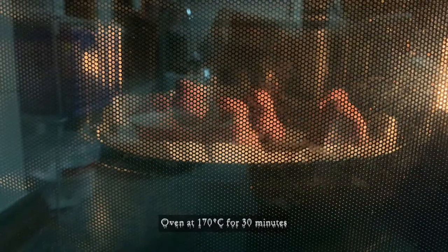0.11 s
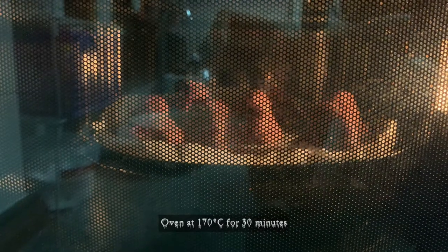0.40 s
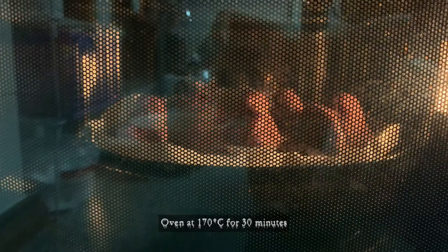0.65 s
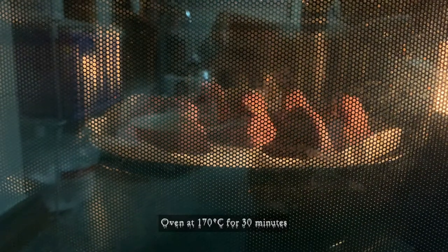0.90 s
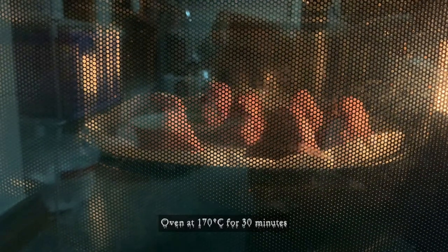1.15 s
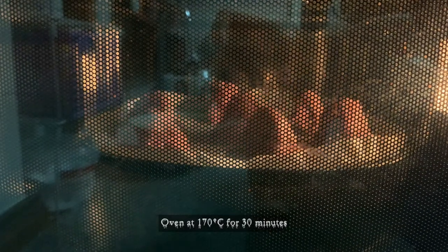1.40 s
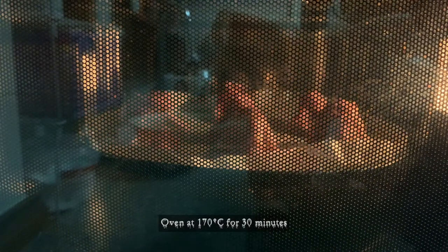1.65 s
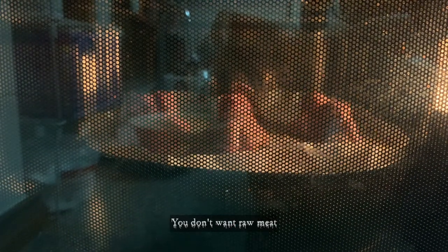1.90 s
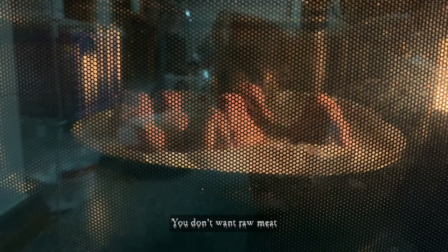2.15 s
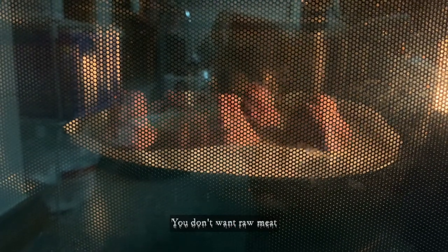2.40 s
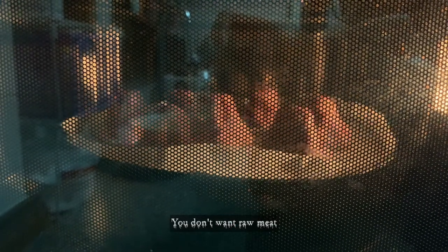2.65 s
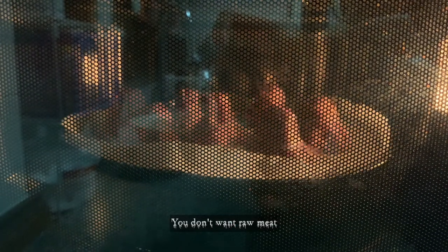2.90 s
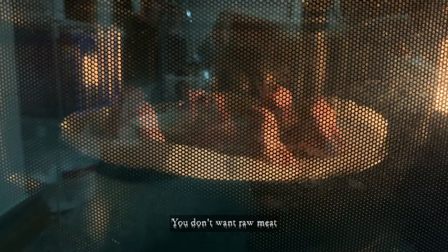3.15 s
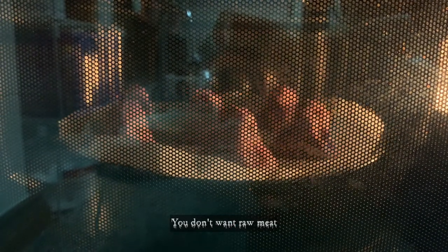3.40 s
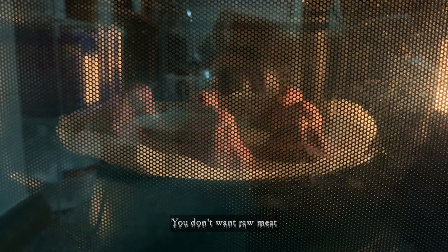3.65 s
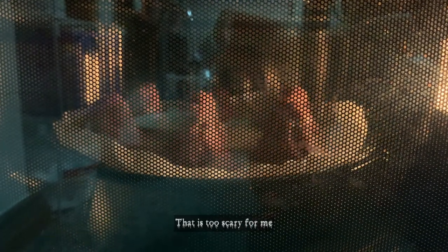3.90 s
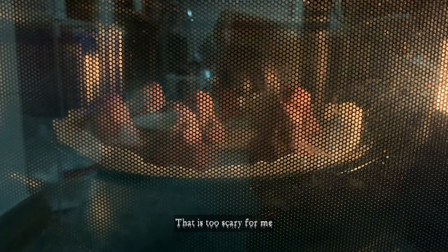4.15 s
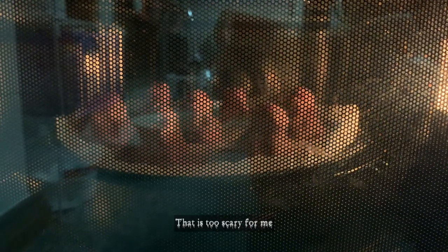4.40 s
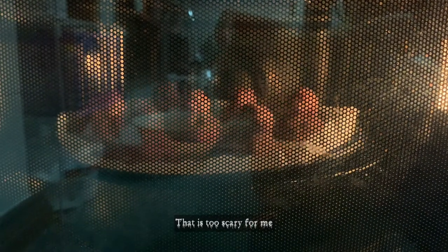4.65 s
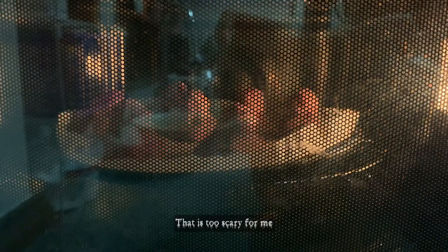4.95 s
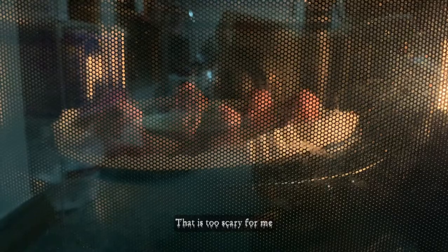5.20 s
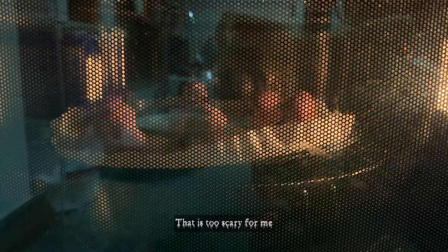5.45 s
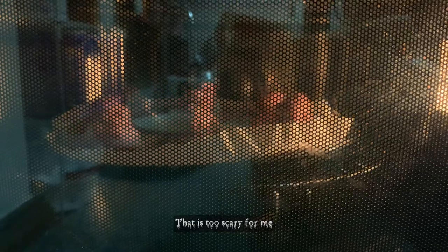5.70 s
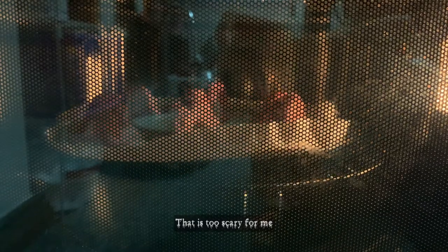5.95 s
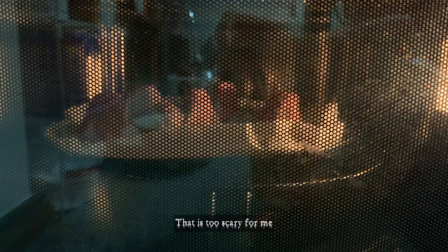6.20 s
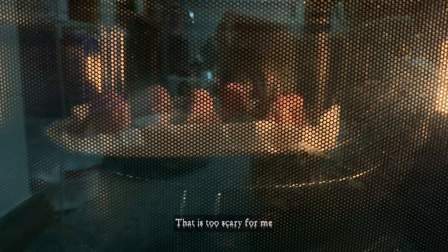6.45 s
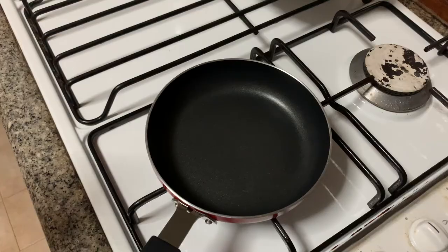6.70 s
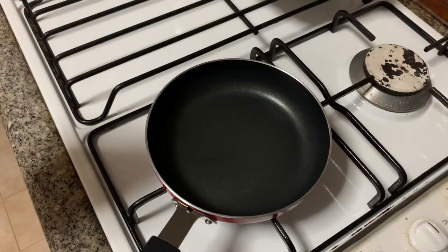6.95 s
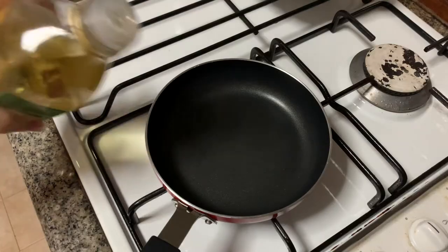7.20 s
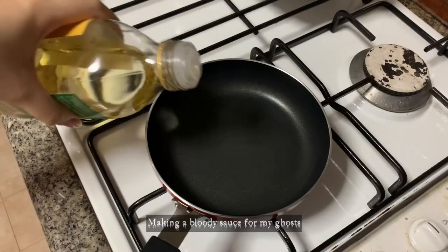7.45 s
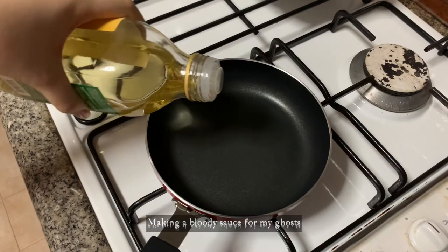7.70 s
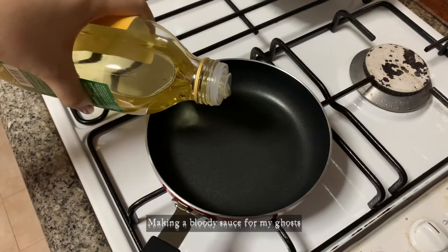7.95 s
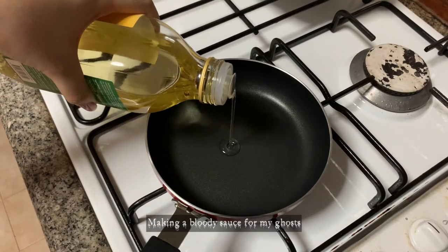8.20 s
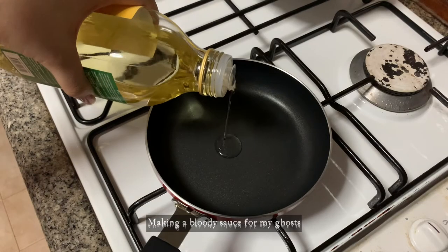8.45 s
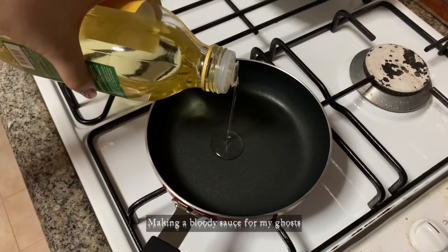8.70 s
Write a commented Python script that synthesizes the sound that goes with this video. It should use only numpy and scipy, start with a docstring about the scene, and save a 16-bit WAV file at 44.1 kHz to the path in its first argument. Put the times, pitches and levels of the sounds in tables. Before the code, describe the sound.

A microwave oven hums and blows air up close while its turntable ticks rapidly, then an abrupt cut leaves it fainter and duller across the kitchen.

```python
"""A combination oven runs in a kitchen, heard at its door, then after a hard cut from the stove nearby.
From the start the transformer hums in sines, the fan blows coloured noise through the casing and adds a
blade tone, fat pops in filtered clicks, and the turntable gear ticks evenly in short decaying modes.
Soon a loose part pings in single sines; later the tray rattles in bursts of resonant noise, and something
thuds softly in low ringing modes. After the cut the ticks are duller and the hum is weaker."""
import sys
import numpy as np
from scipy import signal
from scipy.fft import rfft, irfft
from scipy.io import wavfile
from scipy.ndimage import uniform_filter1d

SR = 44100
rng = np.random.default_rng(int(sys.argv[2]) if len(sys.argv) > 2 else 0)


def store_pcm(level_fs):
    """Save levels as 16-bit WAV."""
    pcm = np.round(np.clip(level_fs, -1, 1) * 32767).astype(np.int16)
    wavfile.write(sys.argv[1], SR, np.atleast_2d(pcm).T)


def volts_from_decibels(level):
    """Turn decibel levels (scalar or array-like) into linear amplitude factors."""
    exponent = np.asarray(level, float) / 20
    return 10 ** exponent


N = 389844  # length in samples
T = np.arange(N) / SR  # time, s
HZ = np.maximum(np.arange(N // 2 + 1) * SR / N, 1)  # frequencies of the spectrum
SIDES = np.array([[1], [-1]])  # left, right
CUT_S = 6.57906  # from the door to the stove
HUM_HZ = 100.08  # twice the mains frequency


def curve(rows, order=1):
    """One column of a table, joined over time."""
    return np.interp(T, np.array(rows)[:, 0], np.array(rows)[:, order])


def colour(rows, order=1):
    """One column of a table, joined over log frequency."""
    return np.interp(np.log(HZ), np.log(np.array(rows)[:, 0]), np.array(rows)[:, order])


def bumps(peaks):
    """Resonance peaks in dB over frequency."""
    return sum(db / (1 + (2 * (HZ - hz) / width) ** 2) for hz, width, db in peaks)


def level(x, db):
    """Scale to an rms level."""
    return x * volts_from_decibels(db) / np.sqrt(np.mean(x ** 2))


def walk(rate):
    """Slow random drift with a spread near 1; rate is in new values per second."""
    k = int(SR / rate)
    steps = np.repeat(rng.standard_normal(N // k + 1), k)
    return 1.3 * uniform_filter1d(uniform_filter1d(steps, k), k)[:N]


def swells(rows):
    """Smooth humps in time, one a row, height 1."""
    return [np.exp(-((T - s) / half) ** 4) for s, half, _ in rows]


def ring(x, hz, t60):
    """A decaying mode, peak 1 for a unit push."""
    pole = np.exp(2j * np.pi * hz / SR - np.log(1000) / (t60 * SR))
    return signal.lfilter([1], [1, -pole], x).imag


def tone(phase, lag):
    """A unit-rms sine that reaches the right microphone a little later; lag is in radians."""
    return np.sqrt(2) * np.cos(phase + SIDES * lag / 2)


def reverb(x, t60, wet_db):
    """Dense reflections, unrelated at the two microphones, added to the direct sound."""
    t = T[:SR // 4]
    tail = rng.standard_normal((2, len(t))) * volts_from_decibels(-60 * t / t60) * np.minimum(t / 0.0031, 1)
    tail = tail / np.sqrt(np.sum(tail ** 2) / 2)
    return x + volts_from_decibels(wet_db) * signal.fftconvolve(x, tail, axes=1)[:, :N]


# patches in the treble, now centred, now wide: f/Hz, change of the sum/dB, change of the difference/dB
PATCHES = [(6900, 1.5, 2.5), (7600, -5, 8), (8160, 0, -5.5), (9000, 0.5, -25.5), (9700, 2, -25.5),
           (10100, -1.5, -5), (11200, -3, -3.5), (11700, -27.5, -4), (12300, -31.5, 0.5),
           (12700, -4.5, -25), (14700, -1, -25.5), (14600, -6, -5), (15600, -30.5, -22)]


def wide_noise(mid_db, side_db, lean, level_db, side_gain_db, echo_s):
    """Two microphones in a noise field: a sum and a partly related difference, each with its colour."""
    a, b = rfft(rng.standard_normal((2, N)))
    # one strong reflection swings the image left and right along the spectrum
    echo = 0.32 * np.exp(-2j * np.pi * HZ * echo_s) * HZ ** 2 / (HZ ** 2 + 700 ** 2)
    tie = colour(lean) + 1j * colour(lean, order=2) + echo
    tie = tie / np.maximum(abs(tie) / .95, 1)
    # many standing waves roughen the spectrum finely: here the walk runs along frequency
    ripple_db, ripple_width_hz = 1.43, 30
    ripple = walk(SR * HZ[-1] / len(HZ) / ripple_width_hz)[:len(HZ)]
    ripple = ripple_db * ripple * HZ / (HZ + 800)
    mid = irfft(a * volts_from_decibels(mid_db + ripple + colour(PATCHES)), N)
    related = tie * a + np.sqrt(1 - abs(tie) ** 2) * b
    side = irfft(related * volts_from_decibels(side_db + colour(PATCHES, order=2)), N)
    return level(mid, level_db) + SIDES * level(side, level_db + side_gain_db)


def turbulent(x, peaks):
    """Turbulence: resonances swell and sink one by one, and patches of the noise flicker."""
    waver_share, waver_per_s = 0.24, 5.6
    flicker_db, flicker_width_hz, flicker_s = 1.0, 900, .04
    hz, t, z = signal.stft(x, SR, nperseg=2048, noverlap=1536)
    at = np.minimum((t * SR).astype(int), N - 1)
    db = 0
    for f, width, d in peaks:
        if d > 0:
            shape = d / (1 + (2 * (hz - f) / width) ** 2)
            db = db + np.outer(shape, waver_share * walk(waver_per_s)[at])
    patch = rng.standard_normal(z.shape[1:])
    for _ in range(2):
        patch = uniform_filter1d(patch, max(int(flicker_width_hz / hz[1]), 1), axis=0)
        patch = uniform_filter1d(patch, max(int(flicker_s / t[1]), 1), axis=1)
    z = z * volts_from_decibels(db + flicker_db * patch / patch.std())
    return signal.istft(z, SR, nperseg=2048, noverlap=1536)[1][:, :N]


# hum overtones: multiple of the hum, level/dB at the door, level/dB at the stove
OVERTONES = [(3, -67.5, -67.5), (4, -62.5, -57.5)]


def transformer(spot, hum, pan_db):
    """The core flexes twice a mains cycle: a clean tone with faint overtones."""
    phase = 2 * np.pi * HUM_HZ * T
    out = volts_from_decibels(curve(hum) + SIDES * pan_db / 2) * tone(phase, .23)
    for row in OVERTONES:
        out = out + volts_from_decibels(row[spot] + 0.55 * walk(3.5)) * tone(row[0] * phase, 0.36)
    return out


# wavering hum at the door: t/s, level/dB
HUM_DOOR = [(0.0, -28.5), (0.03, -27.5), (0.14, -26.5), (2.32, -27), (2.38, -29.5), (3.07, -26),
            (3.64, -27), (3.97, -32), (4.15, -24), (4.48, -28.5), (4.63, -25), (5.27, -28.5), (5.36, -24.5),
            (5.71, -28.5), (5.76, -25), (6.04, -28), (6.24, -25.5), (6.57, -26.5)]


def door_hum():
    """The transformer's steady pitch at the door, with a wavering level."""
    return transformer(1, HUM_DOOR, 0)


# airflow at the door, sum and difference of the two microphones: f/Hz, relative level/dB per Hz
DOOR_MID = [(100, -23.5), (135, -2.5), (165, -2), (210, -7), (300, -10.5), (420, -16), (800, -21.5),
            (1150, -22), (1450, -26.5), (2050, -30.5), (2500, -32), (2800, -39), (3800, -40), (4850, -44.5),
            (5300, -51.5), (7300, -61.5), (8300, -59.5), (16000, -60.5)]
DOOR_SIDE = [(100, -25.5), (135, -3), (250, -2.5), (320, -10.5), (420, -12), (560, -5), (720, -13),
             (940, -6), (1400, -14), (1780, -11), (2050, -20), (2500, -18), (2800, -25.5), (3800, -24.5),
             (4850, -34.5), (5300, -35.5), (7300, -42), (16000, -48.5)]
# low rumble of the casing at the door: f/Hz, relative level/dB per Hz
RUMBLE_DOOR = [(20, -50.5), (32, -32.5), (44, -12.5), (58, -3.5), (72, -2), (95, 6.5), (115, 6.5),
               (132, -9), (150, -37), (400, -90)]
# casing resonances in the airflow: f/Hz, width/Hz, change/dB
CASING = [(173, 25, 5), (252, 65, 3), (321, 3.1, 2), (434, 10, 3.5), (553, 120, 2.5), (667, 74, 4.5),
          (710, 36, -9), (755, 37, 6), (833, 16, 5), (1018, 37, -4.5), (1047, 25, 10), (1135, 24, 6.5),
          (1257, 60, 3.5), (1553, 34, 6), (1658, 28, 5), (1682, 39, 8.5), (1880, 37, 6.5), (2540, 40, 2.5),
          (3900, 90, 4.5), (4400, 50, 5.5), (4530, 35, 7), (1704, 36, -7), (2000, 29, 0), (2600, 41, -1),
          (2680, 100, -8), (2800, 58, 5.5), (3620, 60, 4.5), (3660, 30, -0.5), (3850, 40, 4), (4950, 43, 6),
          (5430, 44, 1.5), (5740, 50, 6.5), (6600, 60, 1.5)]
# share of the difference tied to the sum: f/Hz, leaning left/share, leading left/share
LEAN_DOOR = [(30, 0, .3), (65, 0, 0.28), (100, -0.16, 0.68), (200, 0.058, .75), (500, 0.26, 0.64),
             (810, 0.53, 0.36), (1130, 0.49, 0), (1450, 0.14, -0.18), (2500, 0.049, -.1), (5000, 0, 0)]


def door_airflow():
    """The fan's air rushes through the resonant casing, with a low rumble under it, in gusts."""
    air = wide_noise(colour(DOOR_MID) + bumps(CASING), colour(DOOR_SIDE), LEAN_DOOR, -39.0, -8.5, .0035)
    rumble_db = colour(RUMBLE_DOOR)
    rumble = wide_noise(rumble_db, rumble_db, LEAN_DOOR, -39.5, -11, .0035)
    gusts = volts_from_decibels(.6 * walk(5))
    return gusts * (turbulent(air, CASING) + rumble)


# multiples of the blade tone: multiple, relative level/dB, drift at the door/dB per s
BLADE_ORDERS = [(1, -4, 0), (2, 0.5, -0.8), (3, -16.5, 1.06)]
# moments where the blade tone stands out or drops: middle t/s, half length/s, change/dB
BLADE_SWELLS = [(1.9, 0.079, 3.5), (2.478, 0.09, 4.5), (2.902, .15, -5), (3.182, 0.15, 4.5),
                (3.5, 0.13, -5.5), (4.602, 0.072, 3.5), (6.717, 0.049, -6), (6.914, 0.14, 6),
                (7.404, 0.06, 5), (8.62, 0.084, 6)]


def blades():
    """Blade-passing tone that wavers with the turbulent inflow."""
    blade_hz, door_db, stove_db, waver_db = 114.3, -42.5, -55.5, 0.35
    phase = np.cumsum(2 * np.pi * blade_hz * (1 + .005 * walk(6)) / SR)
    at_door = T < CUT_S
    level_db = np.where(at_door, door_db, stove_db) + waver_db * walk(5)
    level_db = level_db + np.array(BLADE_SWELLS)[:, 2] @ swells(BLADE_SWELLS)
    out = 0
    for k, db, drift in BLADE_ORDERS:
        order_db = level_db + db + drift * T * at_door + 1.5 * walk(7)
        out = out + volts_from_decibels(order_db) * tone(k * phase, 0.23 * k)
    return out


# fat pops: t/s, relative level/dB, left minus right/dB
POPS = [(0.0504, -45.5, -3), (2.1885, -40.5, -4), (2.394, -42.5, -6), (2.811, -44.5, 0), (3.9902, -50, -5),
        (4.4272, -49, 6), (5.0645, -42.5, 4), (5.9677, -47, -4.5), (8.2296, -56, -4)]


def pops():
    """Bursting fat: clicks of about one cycle, from single impulses through a band filter."""
    out = np.zeros((2, N))
    for s, db, pan_db in POPS:
        out[:, int(s * SR)] = volts_from_decibels(db + np.array([pan_db, -pan_db]) / 2)
    band = signal.butter(3, [1500, 6600], "band", fs=SR, output="sos")
    return volts_from_decibels(11.0) * signal.sosfilt(band, out)


# load on the gear as the dish turns: t/s, change/dB
GRIP = [(0, -2), (1.5, 0.5), (2.6, -0.5), (3.1, 0.5), (4.5, -2), (5.4, 1), (6.1, 2), (6.5, 0), (6.6, 1),
        (8.84, 2.5)]
# teeth that strike hard, late or hardly at all; each stands in for the regular tooth:
# t/s, strength/dB, brightness/dB
ODD_TEETH = [(0.0645, 2, -4), (.1436, -6, 1), (0.224, -5.5, 2.5), (0.3028, 6, 15), (.896, -3, 21),
             (.969, 0.5, -2), (1.0223, 2.5, 17.5), (1.103, -2, -1.5), (1.263, -4, 2), (1.3407, 3.5, 15.5),
             (1.4223, 1.5, 9), (1.502, 0, 1), (1.6597, 3, 15), (1.8212, 3, 7), (1.981, 1, 0),
             (2.461, -6, 2), (2.541, -3, 3), (2.621, -2.5, -2), (2.781, -2.5, -2), (2.8602, 2, 11.5),
             (2.94, 3.5, 9.5), (3.023, 2, -4), (3.1, 4.5, -5), (3.3399, 3, 10.5), (3.421, 0, -1),
             (3.5005, -3.5, 3), (3.661, 3, 7), (3.762, -1.5, 13), (3.845, -1, 14), (3.8999, -7, 2),
             (3.98, 3, 7), (4.0605, 2, 3), (4.1405, 0.5, 1), (4.22, -7, -0.5), (4.379, 2, 1),
             (4.458, -3, -1), (4.569, -1, 2), (4.6202, -5.5, 2), (4.699, 3, 5), (4.779, 2, 1.5),
             (4.939, -4, 6), (5.098, 1.5, 11), (5.1779, 3, 7), (5.259, -11, 1), (5.338, -0.5, -1),
             (5.418, 1, 12), (5.578, -2.5, 21), (5.8175, 1.5, -4), (6.0575, 2, 6), (6.218, 2.5, 16),
             (6.297, -1.5, 0), (6.3766, -5, -3), (6.459, -1, 3), (6.797, 6, 7), (6.877, -2, 0),
             (7.197, -1, 0), (7.277, 0, 6), (7.3565, 1.5, 10), (7.437, 2.5, 0), (7.676, 4.5, -2),
             (7.755, 0, 0), (7.915, 0, 0), (7.995, 1.5, 0), (8.155, 3, 0), (8.2345, 2.5, 2), (8.314, 4, 0),
             (8.394, 4.5, -2), (8.474, -4, 0), (8.553, 1, 0), (8.634, -1, 0), (8.793, 3.5, 0)]


def teeth(first_s, period_s, end_s):
    """Rows (t/s, strength/dB, brightness/dB): an even train of chance strength, odd teeth put in."""
    scatter_db, bright_scatter_db = 0.6, 3
    s = np.arange(first_s, end_s, period_s)
    rows = np.column_stack([s, rng.standard_normal((len(s), 2)) * [scatter_db, bright_scatter_db]])
    rows[:, 1] += curve(GRIP)[(s * SR).astype(int)]
    for row in ODD_TEETH:
        if first_s <= row[0] < end_s:
            rows[int((row[0] - first_s) / period_s + .1)] = row
    return rows


# what a tick rings with: f/Hz, t60/s, relative level/dB at the door, the same at the stove, build-up/s
TICK_MODES = [(2348, 0.03, 16, 8, 0.0064), (2236, 0.031, -7.5, 0, 0.00092),
              (2164, 0.16, -12.5, -14, 0.0068), (1800, 0.089, -12.5, -11, 0.0013),
              (2436, 0.16, -8.5, -4.5, 0.005), (2520, 0.08, -10.5, -3, 0.0054),
              (2610, 0.16, -11, -13.5, 0.0059), (3430, 0.038, -12, -21, 0.0015),
              (3770, 0.091, -13, -22, 0.0066), (3160, 0.073, -20.5, -15, .002),
              (1267, 0.081, -11, -11, 0.0016), (5300, 0.022, -32, -26, 0.0029),
              (6200, 0.028, -43, -34, .001), (8400, 0.089, -41.5, -34, .001)]


def gear(rows, level_db, spot):
    """Each tooth slips over a few ms and rings the tray, never quite the same modes twice."""
    bright_from_hz, bright_full_hz = 2900, 7050  # brightness lifts the modes more and more between these
    glide, glide_s = .035, .006  # a tick starts this share flat and rises as the contact lets go
    detune, lag_rad = 0.0047, 0.53  # pitch scatter as a share; usual phase lead at one microphone
    fall_bend = 1.08  # over 1: a tick holds, then drops
    out = np.zeros((2, N + SR))
    t = T[:SR // 8]
    modes = np.array(TICK_MODES)
    hz, t60, rise = (modes[:, [column]] for column in (0, 1, 4))
    mode_db = level_db + modes[:, spot]
    lift = np.log(hz / bright_from_hz) / np.log(bright_full_hz / bright_from_hz)
    lift = np.clip(lift, 0, 1)[:, 0]
    bent = t - glide * glide_s * (1 - np.exp(-t / glide_s))  # time bent for the glide
    shape = (1 - np.exp(-t / rise)) ** 1.29 * volts_from_decibels(-60 * (t / t60) ** fall_bend)
    for s, db, bright_db in rows:
        uneven, start, lag, off = rng.standard_normal((4, len(hz), 1))
        # each mode reaches one microphone a little before the other
        lead = SIDES[:, :, None] * (lag_rad * np.sign(lag) + 0.42 * lag)
        phase = 2 * np.pi * hz * (1 + detune * off) * bent + 0.69 * start + lead
        gain = volts_from_decibels(mode_db + db + lift * bright_db + 1.2 * uneven[:, 0])
        i = int(s * SR)
        out[:, i:i + len(t)] += gain @ (shape * np.sin(phase))
    return out[:, :N]


def cracks(rows):
    """A short crack of fading noise opens each tick, louder for strong and bright ones."""
    blows = np.zeros(N)
    for s, db, bright_db in rows:
        blows[int(s * SR)] = volts_from_decibels(-78 + db + bright_db)
    fall = signal.lfilter([1], [1, -np.exp(-1 / (0.012 * SR))], blows)
    band = signal.butter(4, [3000, 8600], "band", fs=SR, output="sos")
    return signal.sosfilt(band, fall * rng.standard_normal((2, N)))


def scrapes(rows, level_db):
    """Each tooth drags over its neighbour: a short rough puff of noise with the tick."""
    blows = np.zeros(N)
    for s, db, _ in rows:
        blows[int(s * SR)] = volts_from_decibels(level_db + db)
    t = T[:SR // 10] / 0.015  # time in units of 15 ms
    drag = np.convolve(blows, t * np.exp(1 - t) ** 2)[:N]
    wide = signal.butter(4, [1000, 2750], "band", fs=SR, output="sos")
    close = signal.butter(4, [2150, 2700], "band", fs=SR, output="sos")
    rough = drag * rng.standard_normal(N)
    return signal.sosfilt(wide, rough) + volts_from_decibels(6) * signal.sosfilt(close, rough)


def door_ticks():
    """The turntable gear from close by: ringing, cracks and scrapes of the same teeth."""
    rows = teeth(first_s=.0637, period_s=.07992, end_s=CUT_S)
    return gear(rows, -45.5, spot=2) + cracks(rows) + scrapes(rows, -58.5)


# faint pings between the teeth: t/s, level/dB, f/Hz
PINGS = [(.518, -65, 3880), (.712, -56, 3790), (.836, -62, 3780), (.903, -62, 3840), (2.949, -61, 3800),
         (4.495, -61, 3660)]


def pings():
    """Short single rings of a loose part."""
    t60_s, rise_s = 0.055, .003
    out = np.zeros((2, N))
    t = T[:SR // 8]
    for s, db, hz in PINGS:
        i = int(s * SR)
        shape = volts_from_decibels(db - 60 * t / t60_s) * np.minimum(t / rise_s, 1)
        out[:, i:i + len(t)] += shape * tone(2 * np.pi * hz * t, .6)
    return out


# tray rattles: t/s, relative level/dB, lowest resonance/dB, length/s
RATTLES = [(3.846, -55, -8, 0.033), (5.065, -55, -0.5, 0.036), (5.137, -52.5, -4, 0.024),
           (5.276, -61.5, -1, 0.035), (5.42, -64.5, -2, 0.033), (5.562, -65.5, 3, 0.027)]
# resonances of the tray: f/Hz, width/Hz, relative level/dB
TRAY = [(3930, 390, 2), (4800, 650, -11.5), (5850, 310, -7.5), (6080, 300, -8), (6460, 330, -14.5),
        (7980, 950, -14.5), (9600, 400, -23)]


def tray():
    """The glass tray chatters on its rollers: a burst of tiny knocks in its resonances."""
    rise_s, tail_s, tail_db = 0.0025, .12, -17.5
    low, *upper = (volts_from_decibels(db) / (1 + 2j * (HZ - hz) / width) ** 2 for hz, width, db in TRAY)
    knocks = rng.standard_normal((2, N)) * volts_from_decibels(3.7 * walk(300))
    out = 0
    for s, db, low_db, length in RATTLES:
        since = np.maximum(T - s, 0)
        fall = np.exp(-since / length) + volts_from_decibels(tail_db) * np.exp(-since / tail_s)
        shake = volts_from_decibels(db + 17) * (1 - np.exp(-since / rise_s)) * fall
        out = out + rfft(shake * knocks) * (volts_from_decibels(low_db) * low + sum(upper))
    return irfft(out, N)


# soft thuds: t/s, relative level/dB, lowest ring f/Hz, push/s
THUDS = [(5.571, -27, 165, 0.00088), (7.368, -32, 205.6, 0.00063)]
# what a thud rings with: multiple of the lowest ring, t60/s, relative level/dB
THUD_MODES = [(1, 0.2, 0), (1.6, .2, -0.5), (2, 0.34, -3), (2.3, 0.12, -3), (2.8, .2, 0), (3.3, .12, -13)]


def thuds():
    """A soft blow on a hollow body."""
    out = 0
    for s, db, hz, push_s in THUDS:
        blow = np.exp(-((T - s) / push_s) ** 2)
        # press and release: no lasting force
        push = np.gradient(blow) / (2 * np.pi * hz / SR * blow.sum())
        out = out + sum(volts_from_decibels(db + d) / k * ring(push, k * hz, t60) for k, t60, d in THUD_MODES)
    return out * np.ones((2, 1))


def door():
    """The oven from close by: hum and air direct, ticks and rattles with some room."""
    return door_hum() + door_airflow() + reverb(door_ticks() + tray() + pings(), 0.15, -8.0)


# wavering hum at the stove: t/s, level/dB
HUM_STOVE = [(6.6, -44), (6.66, -37), (7.02, -42.5), (7.15, -38), (7.5, -42), (7.69, -38.5), (8.31, -38),
             (8.43, -35.5), (8.84, -38.5)]
# the hum's second multiple swells and dies away across the room: middle t/s, half length/s, level/dB
OCTAVE_SWELLS = [(6.58, 0.059, -54), (7.055, 0.21, -42.5), (8.053, 0.456, -42.5), (8.86, 0.1, -45)]


def stove_hum():
    """The transformer across the room, with its octave swelling and dying away."""
    swell = volts_from_decibels(np.array(OCTAVE_SWELLS)[:, 2]) @ swells(OCTAVE_SWELLS)
    octave = swell * volts_from_decibels(-1.5 * SIDES) * tone(4 * np.pi * HUM_HZ * T, .9)
    return transformer(2, HUM_STOVE, -4) + octave


# airflow at the stove, sum and difference of the two microphones: f/Hz, relative level/dB per Hz
STOVE_MID = [(100, -42), (135, -11), (165, 1.5), (200, -2), (260, -9.5), (320, -9.5), (370, -12),
             (420, -11.5), (700, -19.5), (880, -29), (960, -19), (1400, -25), (1520, -27.5), (2500, -35),
             (3800, -37), (5300, -43), (7300, -46), (11000, -53), (16000, -49)]
STOVE_SIDE = [(100, -30), (135, -8.5), (200, 0.5), (260, -3), (370, -13.5), (560, -12.5), (800, -17),
              (1250, -15.5), (1450, -20), (2500, -26), (3800, -30.5), (5300, -38), (16000, -43)]
# low rumble of the casing at the stove: f/Hz, relative level/dB per Hz
RUMBLE_STOVE = [(20, -38.5), (40, -16), (64, -13), (74, -8), (95, -0.5), (115, -7), (132, -1), (150, -28),
                (400, -89)]
# casing and room resonances in the airflow: f/Hz, width/Hz, change/dB
KITCHEN = [(159, 13, 3), (287, 10, 1.5), (281, 10, 1.5), (378, 11, -11.5), (470, 7.9, 3.5),
           (483, 17, -18.5), (518, 16, -4.5), (650, 16, -5), (890, 28, 4.5), (310, 5, 2), (341.3, 6.4, 7.5),
           (448, 12, -2), (600, 12, -1.5), (824, 20, 11.5), (949, 19, 5), (1130, 38, 2), (1348, 30, 6.5),
           (1620, 24, 6), (2400, 120, 3.5), (3350, 80, 2)]
# share of the difference tied to the sum: f/Hz, leaning left/share, leading left/share
LEAN_STOVE = [(30, -.4, -.1), (100, -0.77, 0.07), (165, -0.99, 0), (230, -0.8, 0.77), (300, 0.18, .85),
              (420, 0.15, .65), (700, -0.1, .4), (1140, 0.13, 0.12), (2000, 0.069, 0), (5000, -0.13, 0)]
# the airflow's treble swells a little, then dulls: t/s, change/dB
TREBLE_STOVE = [(6.6, 2.5), (7.0, 1), (7.35, 3), (7.9, -0.5), (8.84, -3)]


def stove_airflow():
    """The fan's air and the casing's rumble, coloured by the room, with a changing treble."""
    air = wide_noise(colour(STOVE_MID) + bumps(KITCHEN), colour(STOVE_SIDE), LEAN_STOVE, -44.5, -5.0, .006)
    treble = irfft(rfft(air) / (1 + (5600 / HZ) ** 2), N)  # mostly above 5600 Hz
    air = air + (volts_from_decibels(curve(TREBLE_STOVE)) - 1) * treble
    rumble_db = colour(RUMBLE_STOVE)
    rumble = wide_noise(rumble_db, rumble_db, LEAN_STOVE, -48.5, -6.0, .006)
    gusts = volts_from_decibels(0.56 * walk(4.6))
    return gusts * (turbulent(air, KITCHEN) + rumble)


def stove_ticks():
    """The turntable gear across the room: ringing and scrapes, without cracks."""
    rows = teeth(first_s=6.6382, period_s=.07981, end_s=N / SR)
    return gear(rows, -57, spot=3) + scrapes(rows, -64)


def stove():
    """The same oven across the room: duller ticks, more room."""
    return stove_hum() + stove_airflow() + reverb(stove_ticks(), 0.14, -3.0)


def scene():
    """The door stops dead at the cut; the stove fades in over 17 ms."""
    both = blades() + reverb(pops() + thuds(), 0.2, -9.0)
    fade = np.clip((T - CUT_S) / 0.017, 0, 1)
    return (T < CUT_S) * (door() + both) + fade * (stove() + both)


def roll_off(x):
    """The treble ends steeply here."""
    return signal.sosfilt(signal.butter(12, 15700, fs=SR, output="sos"), x)


def record(dry):
    """The finished mix goes out with its levels as they are."""
    return roll_off(dry)


dry = scene()
out = record(dry)
store_pcm(out)
```